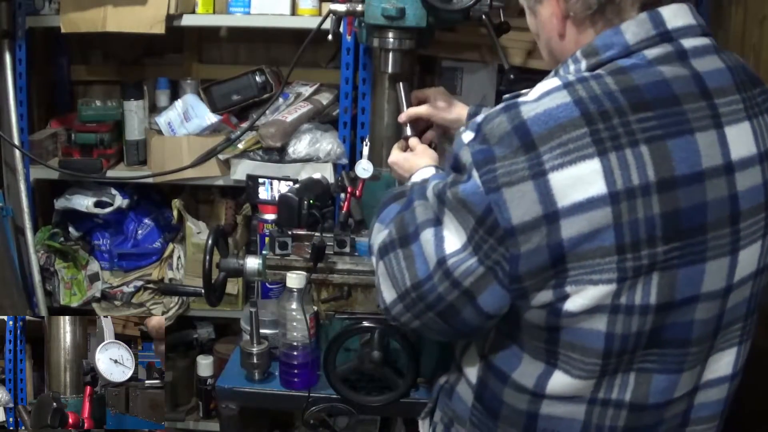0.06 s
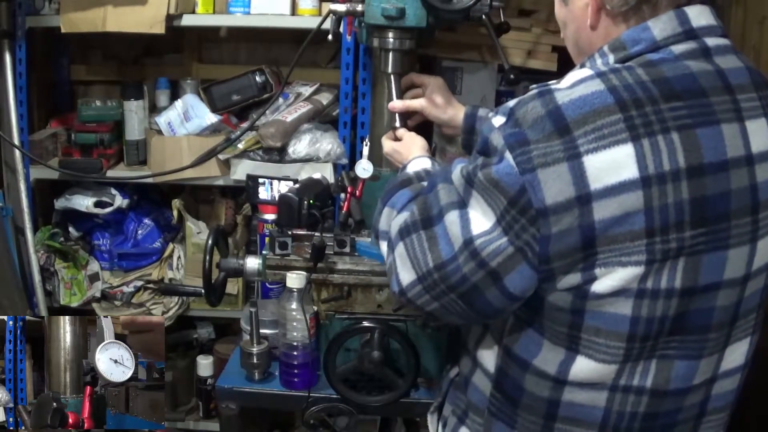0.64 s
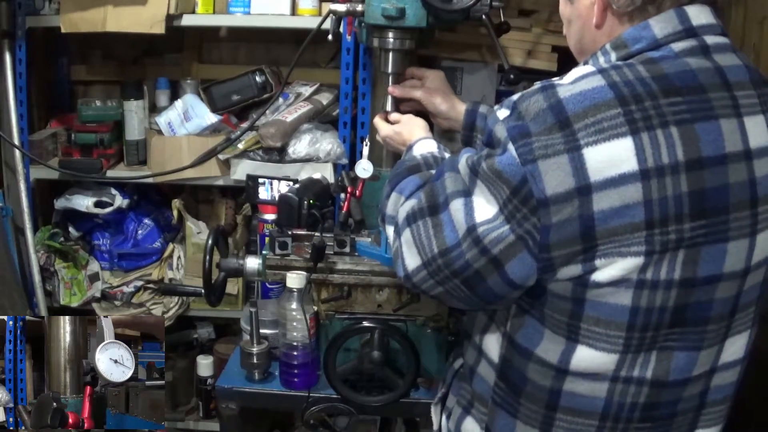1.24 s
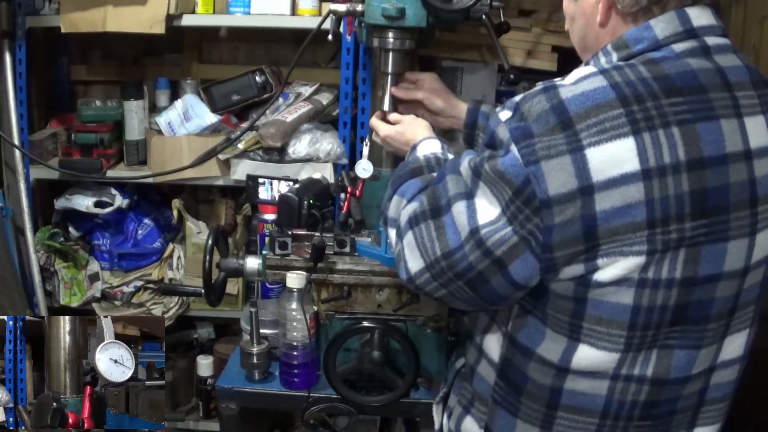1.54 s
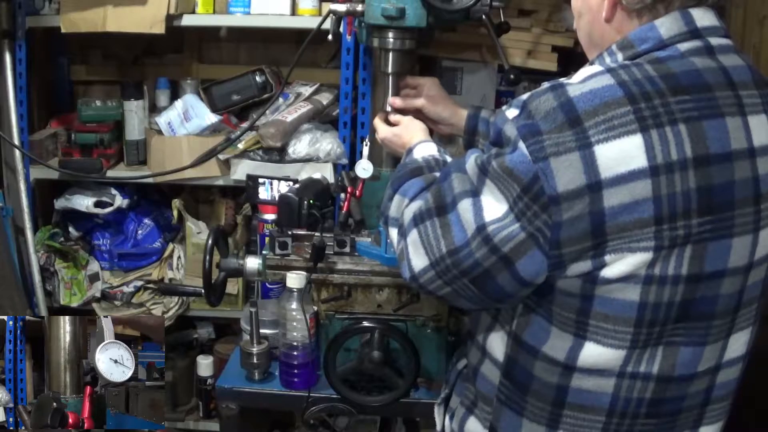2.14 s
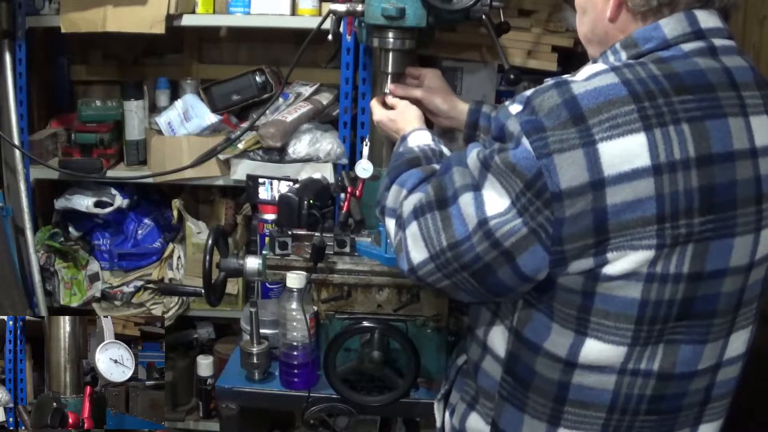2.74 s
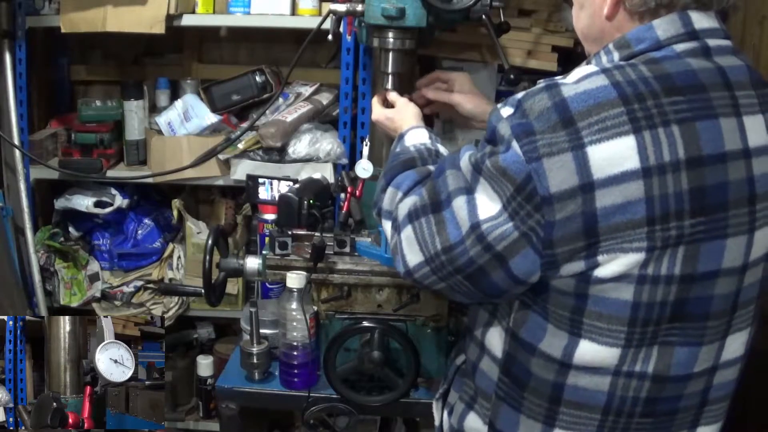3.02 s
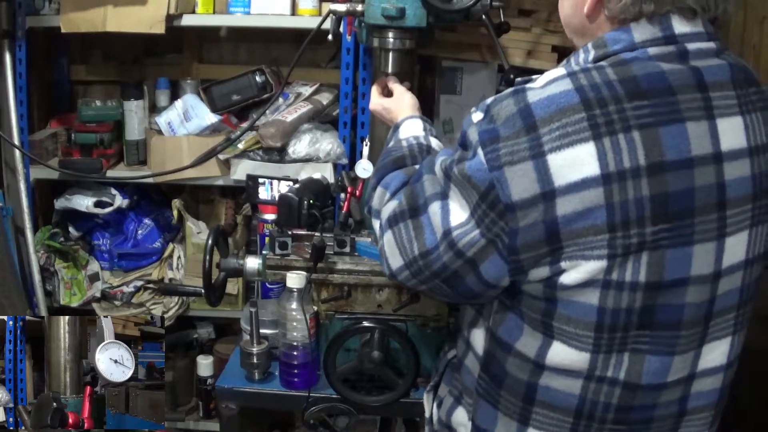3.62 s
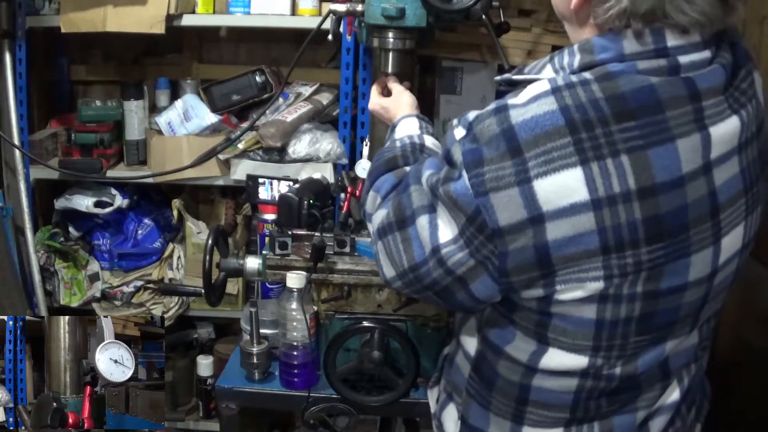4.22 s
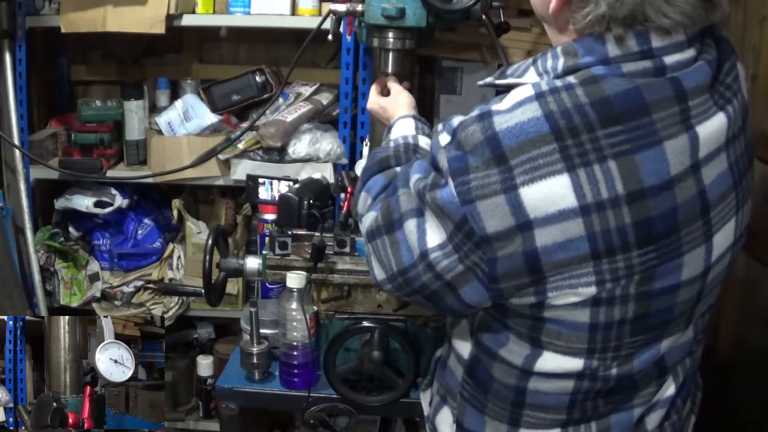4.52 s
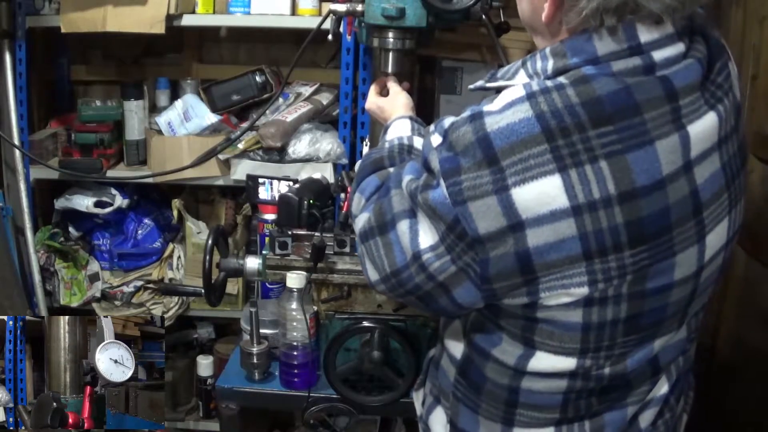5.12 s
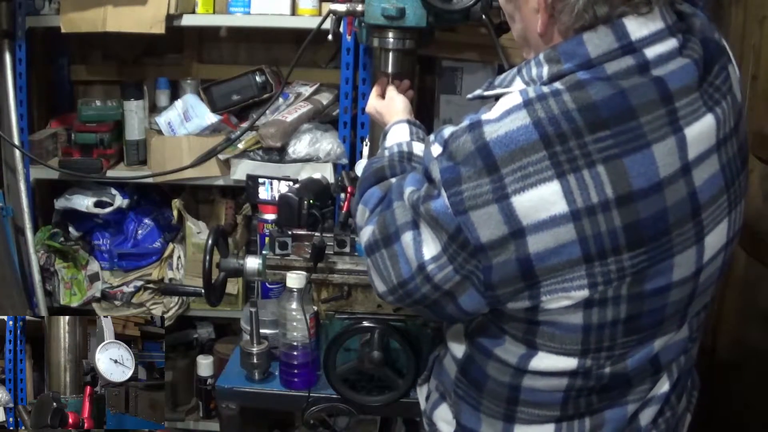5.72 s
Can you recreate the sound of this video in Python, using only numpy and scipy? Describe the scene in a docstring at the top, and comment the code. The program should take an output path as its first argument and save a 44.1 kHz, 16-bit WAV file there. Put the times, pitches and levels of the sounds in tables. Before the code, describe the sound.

In a small workshop with a faint steady hiss, cloth brushes and a steel collet taps and scrapes against a machine spindle. A short hissing slide with sharper clicks leads to three hard metal knocks in quick succession, which set the machine head ringing. Softer hollow clunks, gritty twists and a few thin squeaks follow as the nut is tightened by hand. The metal sounds sit near the centre.

```python
"""First a fleece sleeve rustles, then steel rubs and clicks: a collet (a springy sleeve that grips
a tool) is worked by hand into the tapered hole of a milling machine's spindle, in a small workshop.
Its shank slides up with a hiss and it seats with three hard knocks. The nut is then turned, with
softer clunks, grinding and faint squeaks. Every hit sets the machine head ringing.
A quiet hiss lies under it all."""
import sys
import numpy as np
from scipy import signal
from scipy.fft import rfft, irfft
from scipy.io import wavfile
from scipy.ndimage import uniform_filter1d

SR = 44100
rng = np.random.default_rng(int(sys.argv[2]) if len(sys.argv) > 2 else 0)


def log_audio(samples):
    """Write samples as a 16-bit WAV file to the path given in sys.argv[1]."""
    # one column per channel
    frames = np.atleast_2d(samples).T
    # limit to full scale, then quantise
    limited = np.clip(frames, -1, 1)
    pcm = np.round(limited * 32767).astype(np.int16)
    wavfile.write(sys.argv[1], SR, pcm)


N = 254016
TIME = np.arange(N) / SR


# Three knocks, each a few quick hits. Each row: start in seconds, strength in dB,
# brightness in dB per octave, crack in dB, chime in dB. Table levels are relative; the code mixes them.
KNOCKS = [(3.2979, -29, -4, -13.5, -26), (3.3034, -25.5, 2, -18, -18), (3.3069, -16.5, 4.5, -13, -9),
          (3.3458, -13, 1, 0.5, -19.5), (3.3504, -11.5, -3.5, -35, -38.5), (3.4121, -25, 6, -11, -67),
          (3.4164, -15.5, 5.5, -4.5, -31), (3.4234, -19.5, 0, -11, -15)]
# The tone of a knock's push. Each row: frequency in Hz, level in dB.
KNOCK_COLOUR = [(60, -40), (150, -19.5), (330, -8), (480, -2.5), (1000, 0), (1587, 2.5), (2300, -1),
                (4100, -11.5), (7750, -0.5), (8800, -5.5), (10500, -13), (15000, -34)]
# The nut's chime. Each row: pitch in Hz, level in dB, ring time (seconds to fade by 60 dB).
NUT_TONES = [(4270, -28, .13), (5810, -15.5, 0.085), (6430, -8.5, 0.058), (7830, -1.5, 0.023),
             (8500, -16.5, 0.22), (8564, 1, 0.027), (8970, -11.5, 0.096), (10400, -34, 0.11),
             (13840, -34, .08), (12900, -21.5, .025)]

def knocks(head):
    """The collet seats: steel cracks on steel, the head shakes, and square hits make the nut chime."""
    start, _, _, crack_db, chime_db = np.transpose(KNOCKS)
    force = blows([row[:3] for row in KNOCKS], KNOCK_COLOUR)
    direct = crack(start, from_db(crack_db - 16), ring_s=0.03) + struck(start, chime_db, NUT_TONES)
    return heavy_hit(force, direct, head)


# The nut's clunks. Each row: start in seconds, strength in dB, brightness in dB per octave.
CLUNKS = [(3.9084, -50.5, -6), (4.3767, -27.5, 0.8), (4.3839, -28.5, -0.5), (4.523, -33, -1.9),
          (4.5344, -38, 3), (4.8902, -40.5, 1.2), (5.0948, -48.5, -0.5), (5.1519, -29.5, 1.5),
          (5.4032, -43.5, -0.4), (5.5375, -38, .1)]
# The tone of a clunk's push. Each row: frequency in Hz, level in dB.
CLUNK_COLOUR = [(60, -38), (150, -4), (280, 1), (500, 6), (1587, 0.5), (2400, 3), (4100, 2.5), (7750, 0.5),
                (8800, -1.5), (10500, -13), (15000, -34)]
# The hollow ring of the nut on its thread. Each row: pitch in Hz, level in dB, ring time in seconds.
HOLLOW_TONES = [(283, -20.5, 0.18), (597, -3, 0.034), (634, -9.5, 0.065), (729, -14.5, 0.15)]

def clunks(head):
    """The turning nut bumps the head more softly, with a crack and a hollow ring."""
    start, strength_db, _ = np.transpose(CLUNKS)
    snap = crack(start, from_db(strength_db - 3), ring_s=0.03)
    hollow = struck(start, strength_db - 4, HOLLOW_TONES)
    return heavy_hit(blows(CLUNKS, CLUNK_COLOUR), snap + hollow, head)


# Light steel clicks. Each row: start in seconds, strength in dB, shank ring in dB, collet ring in dB.
CLICKS = [(0.7179, -11, -56, -17), (0.835, -37, -46, -72), (0.9071, -15, -27, -40),
          (0.9108, -13, -21.5, -48), (0.9248, -17, -27, -53), (0.9403, -9.5, -19.5, -45),
          (0.9627, -15, -25, -39), (0.9722, -14.5, -33, -52), (1.014, -24, -32, -56),
          (1.0348, -55, -39, -54), (1.5401, -29, -43.5, -70), (2.1874, -23.5, -60, -75),
          (2.4325, -25.5, -41, -32), (2.4429, -9, -30, -25.5), (2.4544, -19.5, -52, -36),
          (2.506, -19.5, -39, -45), (2.5329, -13, -33, -42), (2.5531, -11, -22.5, -26.5),
          (2.5873, -22, -46, -46), (2.7737, -20.5, -69, -32), (2.784, -17.5, -35, -9.5),
          (2.7888, -5, -38, -8)]
# How the collet, its shank, and the collet while still clear of the taper ring.
# Each row: pitch in Hz, level in dB, ring time in seconds.
COLLET_TONES = [(4450, -14, .026), (7215, -1, .034), (7400, -8, .022), (7240, -30, .17), (5150, -13, .016),
                (5770, -25, .08)]
SHANK_TONES = [(3417, -8.5, 0.043), (3560, -14.5, .04), (3655, -11.5, .028), (4210, -24, 0.035),
               (2950, -17, .025), (6400, -5.5, 0.0063)]
FREE_COLLET_TONES = [(4380, 3, .025), (4468, -16, .2), (5770, 0, .13)]
# The tone of a light touch, and of the tapped head. Each row: frequency in Hz, level in dB.
SOFT_CRACK_COLOUR = [(300, -15.5), (1500, -37), (3000, -0.5), (4400, 23), (5300, -20.5), (6500, -19),
                     (9000, -16.5), (15000, -35)]
HEAD_COLOUR = [(60, -39), (140, -14.5), (300, -14), (500, -5), (750, -2.5), (1600, 3), (2300, 0.5),
               (3000, -3), (4500, -10.5), (7500, -17.5), (10000, -29), (16000, -49)]

def clicks(head, soft_db, hard_db):
    """Steel taps steel: a crack, a brief ring of collet and shank, then the duller ring of the head."""
    start, strength_db, shank_db, collet_db = np.transpose(CLICKS)
    hardness = np.interp(strength_db, [soft_db, hard_db], [0, 1])   # light touches are duller
    direct = crack(start, hardness * from_db(strength_db - 10), 0.012)
    direct += crack(start, (1 - hardness) * from_db(strength_db - 6), 0.0064, SOFT_CRACK_COLOUR)
    direct += struck(start, collet_db + 0.5, COLLET_TONES)
    direct += struck(start, shank_db + 7.5, SHANK_TONES)
    direct += struck(start[0], -34, FREE_COLLET_TONES)   # only the first click rings freely
    taps = impulses(start, from_db(-26.5 + .48 * strength_db))   # the head takes a share of each click
    wash, tones = head
    head_ring = from_db(-1.5) * through(taps, wash) + from_db(-26.5) * through(taps, tones)
    return direct + reflections(direct, ring_s=.055) + colour(head_ring, HEAD_COLOUR)


# The machine head's clear tones. Each row: pitch in Hz, level in dB, ring time in seconds.
HEAD_TONES = [(135, -35, .5), (290, -8, 0.55), (583, -1.5, 0.12), (640, -19, 1), (714.6, 3.5, 0.27),
              (951, 0.5, 0.26), (1168, -3.5, 0.4), (1493, 3.5, 0.15), (1556, -1, 0.26), (2168, 4, 0.15),
              (2218, 4.5, 0.093), (2538, 2, .12)]
# How head and workshop die away. Each row: frequency in Hz, ring time in seconds before ring_scale.
WASH_RING_TIMES = [(120, 0.89), (350, 0.3), (1000, 0.31), (2200, 0.25), (4000, 0.19), (8000, 0.16),
                   (15000, 0.19)]
# Broad humps and dips in that ring. Each row: frequency in Hz, level in dB.
WASH_COLOUR = [(135, -8), (215, -11), (305, 1.5), (390, -1), (500, 2), (730, 0), (1100, -0.5), (1500, -1),
               (1800, 0.5), (2300, 2), (2900, -2.5), (3600, 2.5), (4600, 1), (8000, -1)]

def machine_head(ring_scale, size=SR):
    """The head's answer to one tap: a wash of countless tones and echoes, and a few clear tones."""
    spectrum = rfft(stereo_noise()[:, :size])
    centres_hz = np.geomspace(100, 16000, 14)
    band_position = np.interp(np.fft.rfftfreq(size, 1 / SR), centres_hz, np.arange(len(centres_hz)))
    wash = 0
    for k, hz in enumerate(centres_hz):   # each band fades at its own rate
        band = irfft(spectrum * np.maximum(1 - abs(band_position - k), 0))
        ring_s = ring_scale * at_hz(WASH_RING_TIMES, hz)
        wash += band * from_db(-60 * TIME[:size] / ring_s)
    return through(wash, pulse(WASH_COLOUR)), ring(HEAD_TONES)


# The tone of a hard steel crack. Each row: frequency in Hz, level in dB.
CRACK_COLOUR = [(60, -40.5), (200, -24), (1000, -2), (2800, -9.5), (3600, -3), (4700, 5.5), (6000, -4.5),
                (7500, 0), (9000, -12.5), (11000, -24.5), (16000, -72.5)]

def crack(times, gain, ring_s, spectrum=CRACK_COLOUR):
    """Two steel faces chatter for a few milliseconds as they meet."""
    decay = from_db(-60 / (ring_s * SR))
    envelope = signal.lfilter([1], [1, -decay], impulses(times, gain) + 1e-18)
    return colour(envelope * rng.standard_normal(N), spectrum)


# Short rubs. Each row: start in seconds, length in seconds, dull rub in dB, high singing in dB.
RUBS = [(0.626, 0.023, -48.5, -60.5), (0.683, 0.16, -55.5, -57), (0.848, 0.16, -48, -54.5),
        (1.396, 0.14, -56.5, -72), (1.502, 0.035, -50.5, -65), (1.765, 0.019, -52.5, -64),
        (2.08, 0.017, -44.5, -72), (2.296, 0.012, -50, -49.5), (2.352, .016, -56.5, -58.5),
        (2.416, 0.062, -44.5, -52.5), (2.513, 0.043, -50, -46), (2.552, 0.052, -39, -42.5),
        (2.617, 0.23, -50, -47.5), (3.003, 0.021, -53, -55.5), (3.135, 0.018, -56, -42.5),
        (3.16, 0.022, -55, -57.5), (3.22, .04, -60, -47.5), (3.258, .033, -56, -39.5),
        (5.27, 0.031, -79, -61.5), (5.44, 0.069, -87, -66), (5.681, 0.034, -90, -61.5)]
# The tone of the dull rub. Each row: frequency in Hz, level in dB.
RUB_COLOUR = [(80, -22), (200, -9), (450, 1.5), (900, 0.5), (1500, 4), (2300, -0.5), (3100, -10),
              (4500, -17.5), (7500, -17.5), (15000, -50)]

def rubs():
    """The collet rubs in the taper: the head sounds dull while the collet sings high."""
    start, length, dull_db, singing_db = np.transpose(RUBS)
    dull = strokes(zip(start, length, dull_db), attack_s=.018, fall_db_per_s=230)
    singing = strokes(zip(start, length, singing_db), attack_s=.018, fall_db_per_s=600)
    singing_colour = [(2000, -44), (3500, -18), (5500, -9), (6700, 2.5),
                      (7300, 7), (8200, -3), (11000, -24)]
    slips = friction(rough_db=3, grip_s=0.0048)
    return dull * colour(slips, RUB_COLOUR) + singing * colour(slips, singing_colour)


# How the slide swells and fades. Each row: time in seconds, level in dB.
SLIDE_LEVELS = [(2.44, -69), (2.5, -45.5), (2.58, -40), (2.66, -39.5), (2.76, -42.5), (2.86, -51),
                (2.95, -63.5)]
# The tone of the slide. Each row: frequency in Hz, level in dB.
SLIDE_COLOUR = [(80, -23), (270, 1.5), (550, -6.5), (1300, -13), (2500, -3.5), (3050, -2), (3600, -4.5),
                (4700, -3.5), (7000, -12.5), (8800, 0.5), (10300, -9), (11700, -1.5), (13200, -16),
                (15500, -25)]
# The ring of the bore, the spindle's hole. Each row: pitch in Hz, level in dB, ring time in seconds.
BORE_TONES = [(2630, -6, .015), (3436, -2, .014), (3700, 0, .01), (8520, 1.5, .013), (9400, -7, .011),
              (11600, -3, .008)]

def slide():
    """The shank hisses as it slides up the bore and makes it ring."""
    times, level_db = np.transpose(SLIDE_LEVELS)
    swell = from_db(np.interp(TIME, times, level_db, left=-120, right=-120))
    grit = swell * friction(rough_db=1.5, grip_s=0.0036)
    return from_db(-2) * colour(grit, SLIDE_COLOUR) + from_db(-7.5) * resonate(grit, BORE_TONES)


# Twists of the nut. Each row: start in seconds, length in seconds, level in dB.
TWISTS = [(4.42, 0.14, -50), (4.52, 0.058, -47), (4.72, 0.054, -56.5), (4.762, .05, -54),
          (4.82, 0.042, -47), (4.892, 0.021, -55), (5.092, 0.059, -55.5), (5.19, 0.058, -50.5),
          (5.4, 0.012, -54), (5.535, 0.012, -47)]
# The tone of the grinding thread. Each row: frequency in Hz, level in dB.
THREAD_COLOUR = [(80, -11), (250, -6.5), (450, -2), (650, 4), (1100, -2), (2200, -4), (4500, -10),
                 (8000, -11), (11000, -51), (16000, -41)]

def nut_turning():
    """With each twist the thread grinds and sounds the hollow of the nut."""
    slips = strokes(TWISTS, attack_s=.012, fall_db_per_s=260) * friction(rough_db=3, grip_s=0.0057)
    return from_db(-2) * colour(slips, THREAD_COLOUR) + from_db(-6.5) * resonate(slips, HOLLOW_TONES)


# Faint squeaks. Each row: start in seconds, length in seconds, starting pitch in Hz, level in dB.
SQUEAKS = [(4.995, .07, 3620, -65.5), (5.266, .022, 3240, -59), (5.67, 0.057, 3200, -62.5)]

def squeaks(waver_hz, sag_hz_per_s):
    """The thread squeaks in thin, wavering tones that sag in pitch as the nut slows."""
    waver = waver_hz * wobble(150)
    out = np.zeros(N)
    for start, length, pitch, level_db in SQUEAKS:
        hz = pitch - sag_hz_per_s * (TIME - start) + waver
        envelope = stroke(start, length, level_db, attack_s=.018, fall_db_per_s=698)
        out += envelope * np.sin(2 * np.pi * np.cumsum(hz) / SR)
    return out


# Brushes of the sleeve as the arm moves. Each row: start in seconds, length in seconds, level in dB.
BRUSHES = [(0, 0.084, -50), (0.093, .1, -54.5), (0.214, 0.011, -49.5), (0.302, 0.075, -57),
           (0.364, 0.23, -62.5), (3.605, 0.53, -60.5), (3.856, 0.035, -54), (3.9, 0.47, -67.5),
           (4.814, .03, -52)]
# The tone of the sleeve, and of the fingers. Each row: frequency in Hz, level in dB.
SLEEVE_COLOUR = [(200, -5), (1500, -4), (3500, 2), (6000, 3), (8200, 8), (10500, -3), (16000, -12)]
SCUFF_COLOUR = [(150, -30), (500, -11), (780, 3), (1300, -10), (2300, -10), (5000, -27.5)]

def sleeve_and_fingers():
    """Fleece brushes on fleece, and the fingers give one dull scuff."""
    sleeve = np.max([stroke(start, length, db, attack_s=0.39 * length, fall_db_per_s=258)
                     for start, length, db in BRUSHES], axis=0)
    scuff = stroke(start=0.095, length=0.062, level_db=-51, attack_s=0.027, fall_db_per_s=312)
    fibres = friction(rough_db=1, grip_s=0.011)
    return sleeve * colour(fibres, SLEEVE_COLOUR) + scuff * colour(fibres, SCUFF_COLOUR)


# What nearby metal throws back. Each row: frequency in Hz, level in dB.
REFLECTION_COLOUR = [(1000, -26), (4000, -6.5), (7500, -12.5), (12000, -10.5)]

def reflections(x, ring_s, size=4096):
    """Sound scatters off the machine and shelves, differently to each ear."""
    scatter = rng.standard_normal((2, size)) * from_db(-60 * TIME[:size] / ring_s)
    scatter /= np.linalg.norm(scatter, axis=1, keepdims=True)
    return through(x, through(scatter, pulse(REFLECTION_COLOUR)))


# The tone of the hiss. Each row: frequency in Hz, level in dB.
HISS_COLOUR = [(12, -43), (20, -5.5), (172, -3), (209, -1.5), (431, -7.5), (496, -5), (996, -7.5),
               (1080, -8), (1250, -10.5), (1510, -8), (1740, -11), (2800, -10.5), (4020, -14.5),
               (8090, -15), (15800, -22)]
# The hiss comes from all round. Each row: frequency in Hz, level of the sides against the middle in dB.
HISS_WIDTH = [(40, -28.5), (200, -10.5), (600, -2), (1300, -0.5), (4000, -4), (7000, -8.5), (12000, -56)]

def background(hiss_db, tick_db):
    """Steady hiss, with a very faint high ticking 25 times a second."""
    beat = np.cos(np.pi * 25 * (TIME - 0.0055)) ** 24
    tick_colour = [(2500, -38.5), (3250, -8.5), (3580, -3), (3900, -10.5), (4800, -22.5)]
    ticking = beat * colour(stereo_noise(), tick_colour)
    hiss = colour(stereo_noise(HISS_WIDTH), HISS_COLOUR)
    return from_db(hiss_db) * hiss + from_db(tick_db) * ticking


# How wide other noises sound. Each row: frequency in Hz, level of the sides against the middle in dB.
STEREO_WIDTH = [(60, -24.5), (250, -31), (600, -15.5), (1500, -10), (4000, -8.5), (8000, -18), (15000, -43)]

def stereo_noise(width=STEREO_WIDTH):
    """Noise spread between the two ears."""
    mid, side = rng.standard_normal((2, N))
    return mid + through(side, pulse(width)) * [[1], [-1]]


def blows(rows, spectrum, pivot_hz=2000):
    """One short push for each hit; its brightness tilts the tone around pivot_hz."""
    hz, shape_db = np.transpose(spectrum)
    force = np.zeros(2 * N)
    for start, level_db, brightness in rows:
        tilt_db = brightness * np.log2(hz / pivot_hz)
        blow = pulse(np.column_stack([hz, shape_db + level_db + tilt_db]))
        force[round(start * SR):][:len(blow)] += blow
    return force[:N]


def heavy_hit(force, direct, head):
    """A firm push rings the whole head, on top of the hit's direct sound and its reflections."""
    wash, tones = head
    head_ring = from_db(-2.5) * through(force, wash) + from_db(-23) * through(force, tones)
    return head_ring + direct + from_db(-3.5) * reflections(direct, ring_s=.04)


def friction(rough_db, grip_s):
    """Noise of tiny slips, whose strength changes as the surfaces catch and let go."""
    grip = wobble(int(grip_s * SR))
    return rms_one(stereo_noise() * from_db(rough_db * grip))


def stroke(start, length, level_db, attack_s, fall_db_per_s):
    """Loudness of one hand movement: it rises, holds to the end of its length, and dies away."""
    t = TIME - start
    rise = np.clip(t / attack_s, 0, 1)
    fall_db = np.minimum(fall_db_per_s * np.maximum(t - length, 0), 200)
    return rise * from_db(level_db - fall_db)


def strokes(rows, attack_s, fall_db_per_s):
    """Loudness of several movements; the strongest wins."""
    return np.max([stroke(*row, attack_s, fall_db_per_s) for row in rows], axis=0)


def ring(tones):
    """One second of fading tones: how a part answers one tap."""
    t = TIME[:SR]
    return sum(from_db(db - 60 * t / ring_s) * np.sin(2 * np.pi * hz * t) * (-1) ** k
               for k, (hz, db, ring_s) in enumerate(tones))


def struck(times, levels_db, tones):
    """Tap a ringing part at each time."""
    return through(impulses(times, from_db(levels_db)), ring(tones))


def resonate(x, tones):
    """Make a part ring with noise, keeping the noise's power."""
    response = ring(tones)
    return through(x, response / np.linalg.norm(response))


def colour(x, spectrum):
    """Shape a sound's tone with (Hz, dB) points; white noise keeps its power."""
    shape = pulse(spectrum)
    return through(x, shape / np.linalg.norm(shape))


def pulse(spectrum, size=2048):
    """The shortest pulse with a given tone."""
    gain = from_db(at_hz(spectrum, np.fft.rfftfreq(size, 1 / SR)))
    cepstrum = irfft(np.log(gain))
    cepstrum[1:size // 2] *= 2   # doubling this half and dropping the other packs the energy at the start
    return irfft(np.exp(rfft(cepstrum[:size // 2], size)))


def through(x, response):
    """Let every sample of a sound set off a response."""
    return signal.oaconvolve(np.atleast_2d(x), np.atleast_2d(response), axes=1)[:, :N]


def impulses(times, gain):
    """A one-sample click at each time."""
    out = np.zeros(N)
    out[np.round(np.asarray(times) * SR).astype(int)] = gain
    return out


def wobble(samples):
    """A random drift, smoothed over this many samples."""
    return rms_one(uniform_filter1d(rng.standard_normal(N), samples))


def at_hz(points, hz):
    """Read between a table's rows, with octaves evenly spaced."""
    row_hz, value = np.transpose(points)
    return np.interp(np.log(np.maximum(hz, 1)), np.log(row_hz), value)


def rms_one(x):
    """Scale to an average power of one."""
    return x / np.sqrt(np.mean(x ** 2) + 1e-20)


def from_db(db):
    """Turn decibels into a multiplier."""
    return 10 ** (np.asarray(db) / 20)


def scene():
    """All hits ring the same machine head; the work sits a little to the right."""
    head = machine_head(ring_scale=0.83)
    work = clicks(head, soft_db=-24.5, hard_db=-11) + knocks(head) + clunks(head)
    work += rubs() + slide() + nut_turning() + squeaks(waver_hz=54.7, sag_hz_per_s=800)
    return work * from_db([[-.2], [.2]]) + sleeve_and_fingers() + background(hiss_db=-61.5, tick_db=-62)


def record(dry, cutoff_hz=15900):
    """The very highest treble is cut off steeply."""
    return signal.sosfilt(signal.ellip(12, .1, 80, cutoff_hz, fs=SR, output="sos"), dry)


dry = scene()
out = record(dry)
log_audio(out)
```